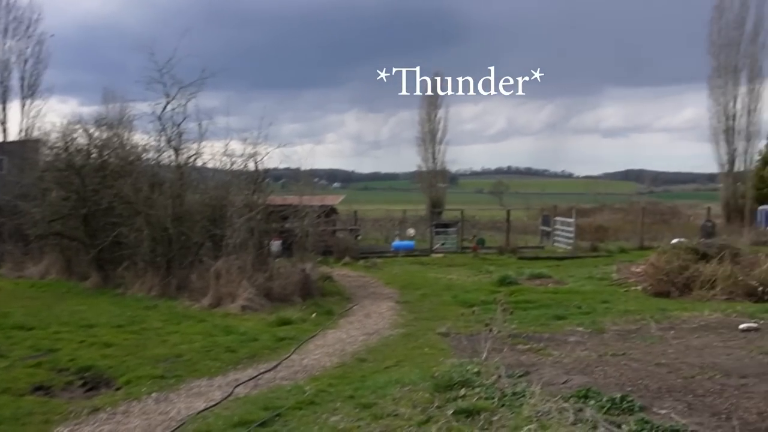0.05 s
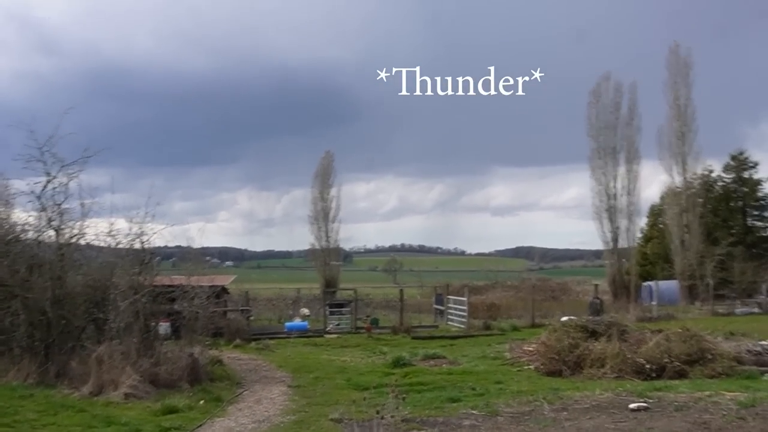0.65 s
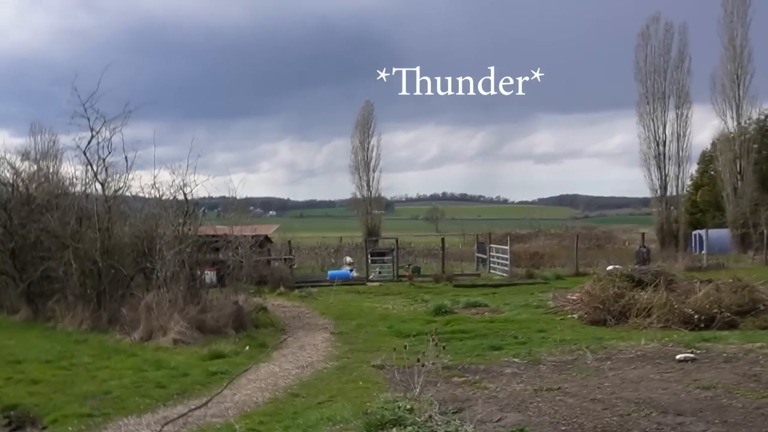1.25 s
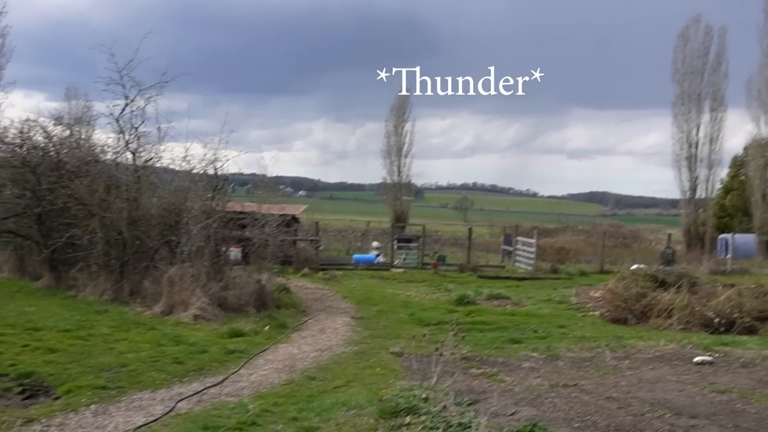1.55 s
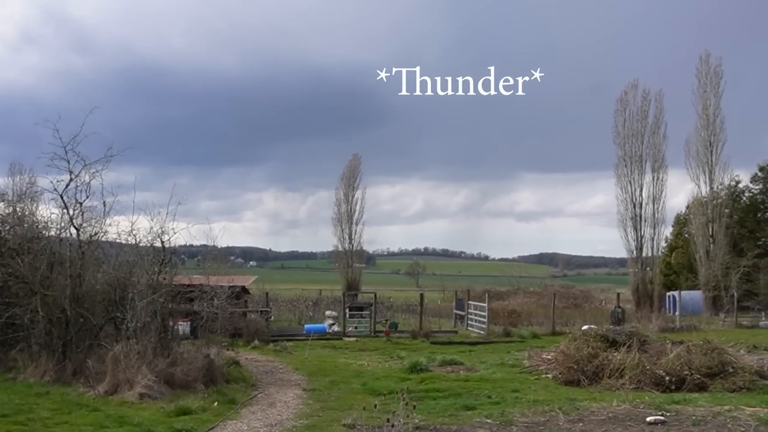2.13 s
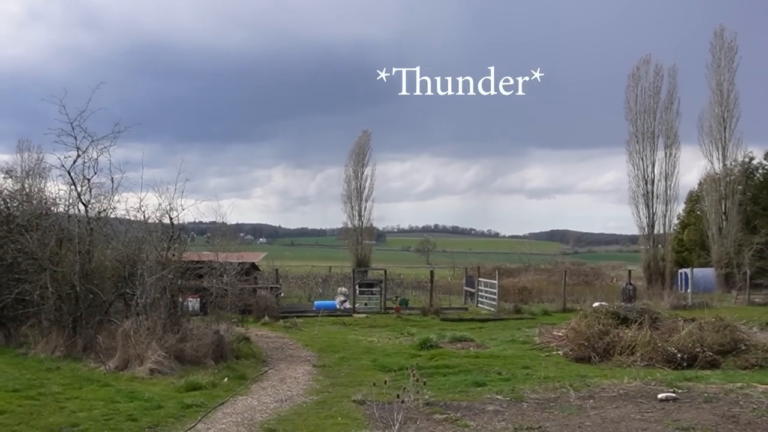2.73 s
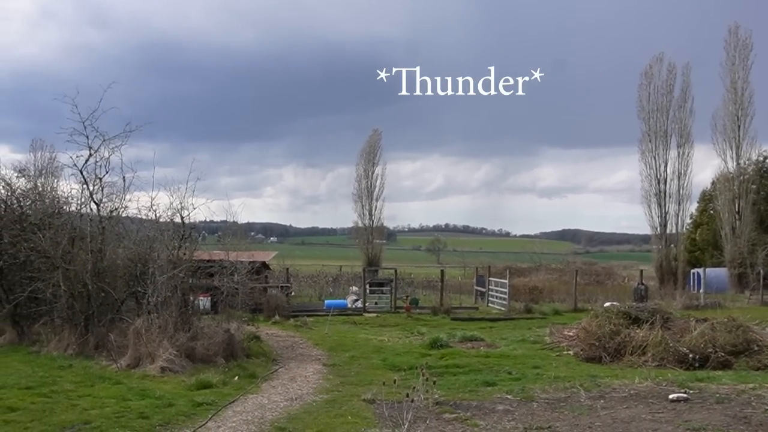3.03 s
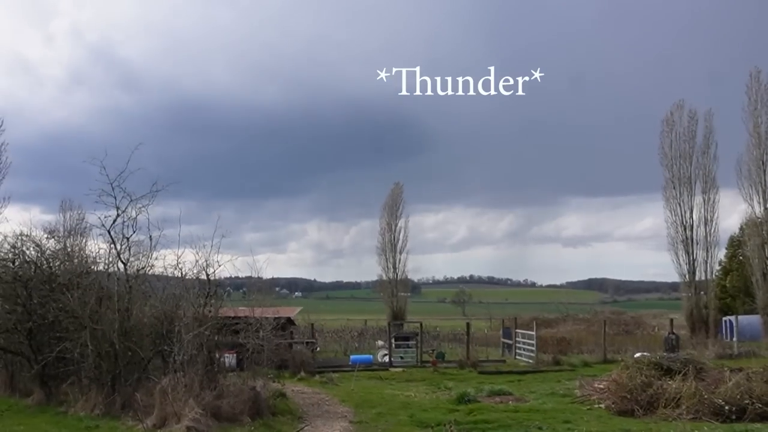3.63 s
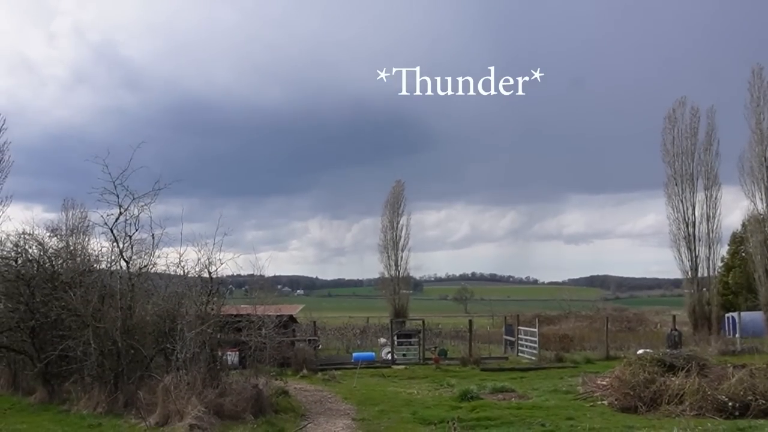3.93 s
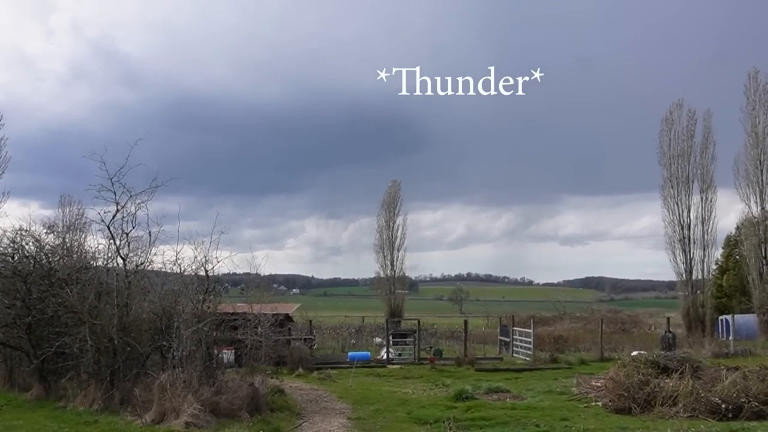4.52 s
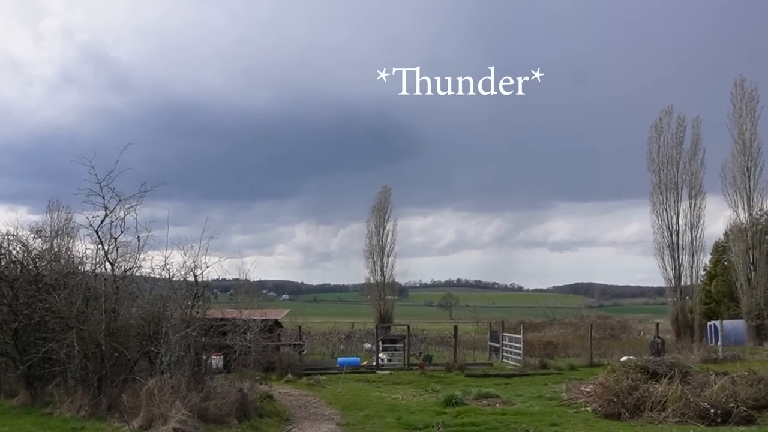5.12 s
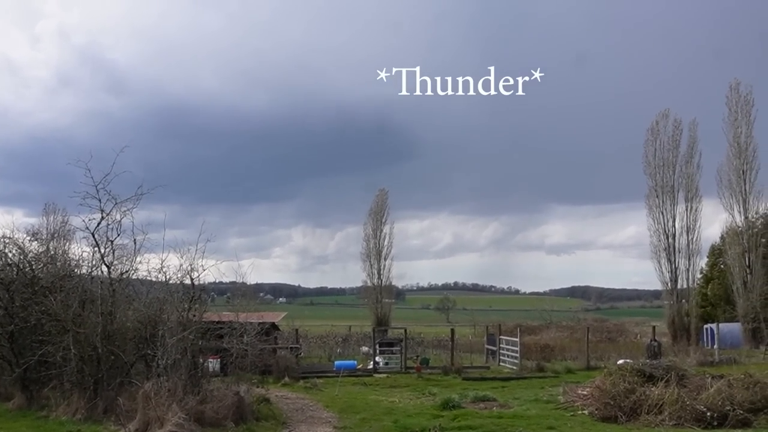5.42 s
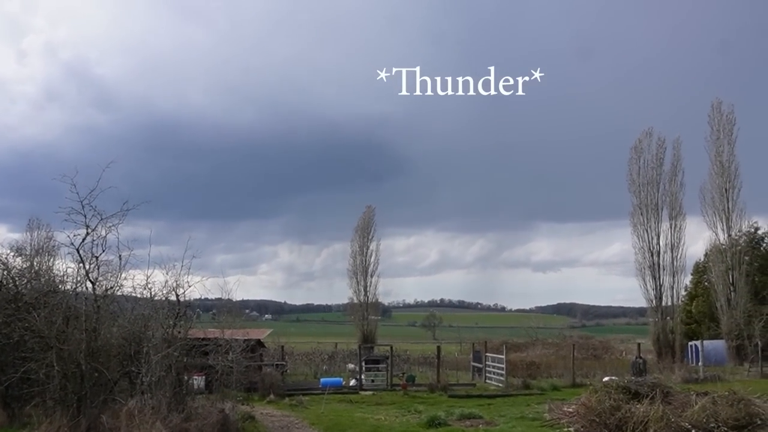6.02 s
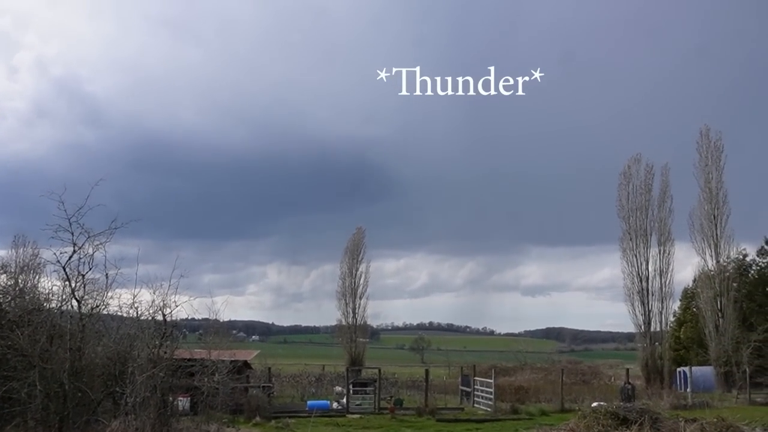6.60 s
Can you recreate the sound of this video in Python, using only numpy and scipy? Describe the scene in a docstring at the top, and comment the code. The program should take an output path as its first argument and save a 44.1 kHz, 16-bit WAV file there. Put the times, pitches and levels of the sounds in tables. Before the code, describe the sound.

Distant thunder rolls in two long, low swells and fades while small birds chirp and whistle over open farmland.

```python
"""Distant thunder rolls over open farmland in two long swells and dies away: shocks from the lightning
channel, dulled by distance and blurred by the hills. Small birds in a hedge whistle, buzz, chirp and
scold throughout, with gliding tones and fast throat pulses that the trees scatter back. Something snaps
once close by. Underneath, the fields hush, a far engine drones and wind nudges the microphone."""
import sys
import numpy as np
from scipy import signal
from scipy.fft import rfft, irfft, next_fast_len
from scipy.io import wavfile
from scipy.ndimage import map_coordinates

SR = 44100
rng = np.random.default_rng(int(sys.argv[2]) if len(sys.argv) > 2 else 0)


def pcm_store(signal):
    """Save signal as 16-bit PCM."""
    levels = np.round(np.clip(np.atleast_2d(signal), -1, 1) * 32767)
    wavfile.write(sys.argv[1], SR, levels.astype(np.int16).T)


N = 302526


def amp(db):
    """Decibels to gain."""
    return 10 ** (np.asarray(db) / 20)


def unit(x):
    """Scale to rms 1."""
    return x / np.sqrt(np.mean(x ** 2) + 1e-20)


def seconds(length):
    """Sample times of a stretch."""
    return np.arange(max(int(length * SR), 8)) / SR


def wobble(rate, size=N):
    """Smooth random modulation, rate knots a second."""
    knots = rng.standard_normal(int(size * rate / SR) + 4)
    return map_coordinates(knots, [np.arange(size) * rate / SR])


def coloured(x, eq):
    """x through an EQ curve of (f/Hz, level/dB) points, at rms 1."""
    m = next_fast_len(len(x) + 8192)
    hz, db = np.transpose(eq)
    gain = amp(np.interp(np.log(np.fft.rfftfreq(m, 1 / SR) + 1), np.log(hz + 1), db))
    return unit(irfft(rfft(x, m) * gain, m)[:len(x)])


def tone(hz):
    """A sine of rms 1 that follows a pitch curve."""
    return np.sqrt(2) * np.sin(2 * np.pi * np.cumsum(hz) / SR)


def gate(t, attack_s, release_s):
    """Soft start and end of a note."""
    return np.sin(np.pi / 2 * np.clip(np.minimum(t / attack_s, (t[-1] - t) / release_s), 0, 1)) ** 2


def add(track, s, x):
    """Mix x into the track at time s."""
    i = max(int(s * SR), 0)
    track[i:i + len(x)] += x[:max(N - i, 0)]


def swells(rows, rest_db):
    """Level in dB of bell-shaped swells that rise out of a steady rest."""
    t = np.arange(N) / SR
    power = sum(amp(db) ** 2 * np.exp(-((t - s) / width) ** 2) for s, db, width in rows)
    return 10 * np.log10(power + amp(rest_db) ** 2)


# Bouts of activity in the hedge: t/s, peak level/dB, half-width/s
BUSTLE_BOUTS = [(.08, 4.5, 0.23), (.88, 1.5, 0.28), (1.7, -1.5, 0.15), (2.3, 1, 0.19), (2.8, 4, 0.27),
                (3.52, -1, 0.074), (3.98, .5, 0.25), (4.76, 7, 0.11), (5.1, 3, 0.15), (5.42, 7, 0.13),
                (6.12, -2, 0.36)]

def bustle_db():
    """A shared fader ride: how busy the hedge is."""
    return swells(BUSTLE_BOUTS, rest_db=-6)


# EQ of the open-air bed: f/Hz, level/dB
AIR_EQ = [(30, -47), (110, -3.5), (200, 5.5), (300, -11.5), (750, -4.5), (1300, -9), (2200, -15.5),
          (4100, -21.5), (5700, -25), (8500, -28), (10300, -36), (15500, -37)]

def air(level_db=-50, stir=0.41):
    """The hush of the open fields, a little fuller when the hedge is busy."""
    hush_db = level_db + stir * bustle_db() + wobble(2.606)
    return amp(hush_db) * coloured(rng.standard_normal(N), AIR_EQ)


# Fader ride of the drone: t/s, level/dB
DRONE_RIDE = [(0, -50), (1.2, -61), (2.2, -41.5), (4.8, -41), (5.6, -44.5), (6.86, -44)]
# Engine orders: multiple of the firing rate, relative level/dB
DRONE_ORDERS = [(1, 0.5), (1.5, -18.5), (2, -10), (3, -26.5)]

def engine(firing_hz=82.6, trim_db=-1, waver_db=2.36):
    """Only the lowest orders of a far engine carry over the fields, wavering on the way."""
    drone_db = np.interp(np.arange(N) / SR, *np.transpose(DRONE_RIDE)) + trim_db
    hz = firing_hz * (1 + 0.0057 * wobble(4.4))
    return sum(amp(drone_db + db + waver_db * wobble(5)) * tone(k * hz) for k, db in DRONE_ORDERS)


# Gusts: t/s, peak level/dB, half-width/s
WIND_GUSTS = [(.32, -34, 0.17), (.73, -37.5, 0.061), (1.13, -35.5, 0.062), (1.66, -32.5, 0.33),
              (2.25, -32, 0.2), (2.68, -32.5, 0.17), (3.13, -36, 0.066), (3.6, -36, 0.38),
              (4.33, -35.5, 0.085), (4.85, -45.5, 0.23), (6.42, -41, 0.12), (6.7, -38, 0.041)]
# EQ of the bassy buffeting: f/Hz, level/dB
BUFFET_EQ = [(8, 7), (25, 13.5), (50, -1), (100, -3.5), (170, -11), (350, -43), (1000, -110)]

def wind(calm_db=-51.5, trim_db=2.5):
    """Light gusts buffet the microphone."""
    buffet_db = swells(WIND_GUSTS, calm_db) + trim_db + 0.36 * wobble(26)
    return amp(buffet_db) * coloured(rng.standard_normal(N), BUFFET_EQ)


# EQ of the fine crackle in the hedge: f/Hz, level/dB
CRACKLE_EQ = [(300, -27), (1200, -8.5), (2500, 0.5), (4500, 8), (6500, -1.5), (8800, -3), (10500, -21),
              (15000, -36)]

def flock(count=340, pip_db=-61, crackle_db=-63, crackles_per_s=280, crackle_t60=0.048):
    """Birds deeper in the hedge give tiny falling pips amid a dry crackle; both follow their bustle."""
    calls = np.zeros(N)
    for when, pitch, slope, size, span in rng.random((count, 5)):
        t = seconds(0.0072 + 0.0094 * span)
        hz = 1300 * 3.3 ** pitch * (1 - slope * 12 * t + 0.09 * wobble(990, len(t)))
        add(calls, when * N / SR, amp(pip_db + 7.2 * size ** 2) * tone(hz) * gate(t, 0.00034, 0.0015))
    touches = (rng.random(N) < crackles_per_s / SR) * rng.exponential(size=N)
    bursts = signal.fftconvolve(touches, amp(-60 * seconds(0.01) / crackle_t60))[:N]
    crackle = coloured(bursts * rng.standard_normal(N), CRACKLE_EQ)
    return amp(bustle_db()) * (calls + amp(crackle_db) * crackle)


def clicks(contacts, eq, t60, trim_db):
    """Each contact is a soft-clipped noise burst that dies within milliseconds."""
    out, t = np.zeros(N), seconds(0.03)
    for s, db in contacts:
        burst = unit(np.tanh(0.5 * coloured(rng.standard_normal(len(t)), eq)))
        add(out, s, amp(db + trim_db - 60 * t / t60) * burst)
    return out


# Tick cues: t/s, level/dB
TICK_CUES = [(.49, -32), (.93, -32), (1.625, -36), (2.317, -32), (3.363, -32.5), (3.448, -33.5),
             (3.793, -32), (4.653, -39), (5.565, -27.5)]
# EQ of a tick: f/Hz, level/dB
TICK_EQ = [(500, -22), (2000, 11), (4500, 0), (8500, -2), (11000, -14.5), (15500, -19)]

def ticks():
    """Sparse, bright, dry ticks."""
    return clicks(TICK_CUES, TICK_EQ, t60=0.0066, trim_db=-7.5)


# Contacts of the snap: t/s, level/dB
SNAP_CONTACTS = [(4.0232, -22.5), (4.0293, -17), (4.0325, -14)]
# EQ of its crack: f/Hz, level/dB
SNAP_EQ = [(150, -26.5), (450, -25), (700, -11), (1120, 2), (1500, -20), (2200, 0), (3600, -10.5),
           (5400, -9.5), (6700, -4.5), (9000, -11.5), (15600, -13)]
# Ringing modes of the snapped thing: f/Hz, relative level/dB, t60/s
SNAP_MODES = [(710, -6.5, 0.033), (1054, -7, 0.018), (1715, -11, 0.023)]

def snap():
    """A sharp crack in quick contacts, each knocking a small hollow body."""
    out = clicks(SNAP_CONTACTS, SNAP_EQ, t60=0.014, trim_db=-3)
    t = seconds(0.04)
    for s, db in SNAP_CONTACTS:
        for hz, mode_db, t60 in SNAP_MODES:
            ring = np.sin(2 * np.pi * (hz * t + rng.random()))
            add(out, s, amp(db + mode_db - 60 * t / t60) * ring)
    return out


# Pip cues: t/s, length/s, centre f/Hz, level/dB
PIP_CUES = [(.755, 0.016, 2390, -50.5), (.858, 0.01, 3170, -45.5), (.872, 0.015, 3160, -55),
            (0.943, .007, 2780, -48), (.983, 0.0064, 3130, -47), (1.258, 0.009, 3270, -54),
            (2.19, .008, 5240, -49.5), (2.206, 0.0086, 3130, -50.5), (2.35, 0.0074, 2950, -48),
            (2.413, 0.01, 2510, -47.5), (2.573, .004, 4650, -41), (2.583, .004, 4820, -38),
            (3.572, 0.0039, 4710, -38), (6.007, 0.0056, 2220, -45), (6.753, 0.0044, 4670, -46),
            (6.7635, 0.0036, 5000, -38.5)]

def pips(fall=0.19, rasp=0.072):
    """Tiny bird notes that slide down within milliseconds."""
    out = np.zeros(N)
    for s, length, centre_hz, db in PIP_CUES:
        t = seconds(length)
        hz = centre_hz * (1 - fall * (t / t[-1] - 0.5) + rasp * wobble(930, len(t)))
        add(out, s, amp(db) * tone(hz) * gate(t, 0.001, 0.0012))
    return out


# Two-note chirps: t/s, top f/Hz, level/dB
CHIRP_CUES = [(0, 4690, -43), (1.693, 4580, -48.5), (2.775, 4600, -44), (3.823, 4600, -47),
              (4.706, 4740, -43.5), (5.848, 4560, -43.5)]

def chirps(octave_db=-28, trim_db=-5, spacing_s=0.069, rasp=0.008):
    """Pairs of short arched notes, the second one lower and flatter."""
    out = np.zeros(N)
    for s, top_hz, db in CHIRP_CUES:
        pair = [(s, 0.033, top_hz, 0.25), (s + spacing_s, 0.0414, top_hz * 0.835, 0.15)]
        for start, length, note_hz, arch in pair:
            t = seconds(length)
            hz = note_hz * (1 - arch * np.linspace(-1, 1, len(t)) ** 2 + rasp * wobble(1070, len(t)))
            voice = tone(hz) + amp(octave_db) * tone(2 * hz)
            level = amp(db + trim_db + 1.4 * wobble(250, len(t)))
            add(out, start, level * voice * gate(t, 0.0032, 0.0039))
    return out


# Resonances of a scolding throat: multiple of the centre frequency, level/dB
THROAT_EQ = [(.3, -24.5), (.45, 0), (.6, -13.5), (.75, -2.5), (.92, -4.5), (1.25, -8), (1.5, -23),
             (1.85, -27), (2.2, -22.5), (2.6, -37), (3.6, -30)]

def chip(length, centre_hz, pulse_ratio=0.305, fall=0.251, breath=0.35, rasp=0.04):
    """A scolding note: fast pulses ring the bird's throat, hold their pitch and drop as the note dies."""
    t = seconds(length + 0.0085)
    hz = centre_hz * pulse_ratio * (1 - fall * (t / t[-1]) ** 4 + rasp * wobble(690, len(t)))
    pulses = unit(sum(tone(k * hz) for k in range(1, 11)))
    throat = [(k * centre_hz, db) for k, db in THROAT_EQ]
    voice = coloured(pulses + breath * rng.standard_normal(len(t)), throat)
    flutter = amp(2 * wobble(330, len(t)))
    return unit(voice * flutter) * gate(t, 0.00095, 0.0045)


# Harsh foreground chips: t/s, length before the tail/s, centre f/Hz, level/dB
CHIP_CUES = [(0.315, 0.0068, 3840, -43), (0.3325, 0.011, 4060, -34.5), (0.567, 0.02, 3890, -48.5),
             (0.786, 0.011, 4450, -49), (0.828, 0.015, 2970, -48), (2.051, 0.0099, 3590, -44.5),
             (2.549, 0.013, 3880, -45.5), (2.892, 0.015, 3640, -45), (3.124, 0.0064, 3160, -44.5),
             (3.53, 0.022, 4090, -48), (3.978, 0.016, 4540, -50), (4.155, 0.013, 4030, -41.5),
             (4.211, 0.0096, 3800, -43.5), (4.585, 0.02, 3820, -44.5), (5.266, 0.011, 4130, -30.5),
             (5.649, 0.0093, 3100, -48), (6.014, 0.011, 4090, -31), (6.087, .022, 3710, -49),
             (6.155, 0.0086, 3010, -45)]

def scolding(soft_count=24, soft_db=-58, soft_hz=3700, soft_s=0.0102):
    """The near birds scold; softer chips come at random, stronger when the hedge is busy."""
    near, soft = np.zeros(N), np.zeros(N)
    for s, length, centre_hz, db in CHIP_CUES:
        add(near, s, amp(db) * chip(length, centre_hz))
    for slot, (when, span, pitch) in enumerate(rng.random((soft_count, 3))):
        s = (slot + when) / soft_count * N / SR
        add(soft, s, chip(soft_s * (0.5 + span), soft_hz * 1.6 ** (pitch - 0.5)))
    return near + amp(soft_db + bustle_db()) * soft


# Buzzy notes: t/s, length/s, first f/Hz, last f/Hz, sweep depth/Hz, sweep rate/Hz, level/dB, octave/dB
BUZZ_CUES = [(1.105, .15, 6050, 5250, 500, 200, -60.5, -28),
             (1.404, 0.065, 5700, 5600, 750, 100, -58.5, -16),
             (1.467, 0.049, 7550, 8160, 735, 330, -52.5, -35),
             (1.9, 0.22, 8500, 7550, 450, 140, -67.5, -35), (2.892, 0.077, 3900, 4080, 1010, 176, -46, -18),
             (2.917, 0.28, 3333, 3260, 40, 77, -56.5, -10), (2.915, 0.25, 4070, 4150, 90, 180, -60, -7),
             (2.905, 0.176, 4920, 5020, 25, 240, -62, -29),
             (2.976, 0.236, 8100, 8220, 520, 290, -54.5, -35),
             (4.039, 0.072, 3345, 3200, 347, 102, -39, -37),
             (4.097, 0.054, 3260, 3192, 110, 123.3, -38.5, -24),
             (4.131, 0.11, 3210, 3270, 50, 100, -51, -5.5), (5.39, 0.22, 7550, 7750, 585, 400, -61, -22),
             (5.898, 0.25, 7340, 7950, 604, 320, -56.5, -44), (6.346, 0.39, 7150, 8070, 573, 290, -63, -37),
             (6.356, 0.44, 4014, 4285, 510, 286, -59.5, -23)]

def buzzes(jitter_hz=9, rough_db=2, pulse_db=3, overtone_step_db=-10.5):
    """A bird's pitch sweeps up and down fast enough to buzz, and each sweep is a pulse."""
    out = np.zeros(N)
    for s, length, first_hz, last_hz, sweep_hz, rate, db, octave_db in BUZZ_CUES:
        t = seconds(length)
        cycle = 2 * np.pi * np.cumsum(rate + jitter_hz * wobble(91.6, len(t))) / SR
        sweep = np.cos(cycle) + 0.17 * wobble(600, len(t))
        hz = np.linspace(first_hz, last_hz, len(t)) + sweep_hz * sweep
        pulses = unit(amp(pulse_db * np.sin(cycle) + rough_db * wobble(222, len(t))))
        overtones = sum(amp(octave_db + overtone_step_db * (k - 2)) * tone(k * hz)
                        for k in (2, 3, 4) if k * hz.max() < SR / 2)
        add(out, s, amp(db) * (tone(hz) + overtones) * pulses * gate(t, 0.067 * length, 0.38 * length))
    return out


# Three whistling birds: t/s, length/s, first f/Hz, last f/Hz, bow/Hz, level/dB, swell/dB, octave/dB
MELLOW_BIRD = [(1.06, 0.26, 2240, 2097, -150, -59.5, -6, -28), (1.645, 0.25, 2414, 2630, 30, -50.5, 1, -20),
               (2.97, .2, 2390, 2500, -230, -48.5, 16, -39), (3.115, .31, 2480, 2700, -10, -49, -5, -42),
               (4.23, 0.27, 1866, 2120, 60, -63.5, -13, -42)]
THIN_BIRD = [(.43, 0.15, 8500, 8060, 399, -58.5, -7, -40), (1.12, 0.18, 8250, 7670, -230, -65, -6, -40),
             (1.402, 0.098, 8600, 7540, -800, -48, 10, -39), (1.655, 0.052, 5180, 5740, 200, -65, -3, -40),
             (2.45, 0.064, 8100, 7850, -44, -61, -2, -40), (2.73, 0.047, 5300, 5730, 100, -58, 3, -40),
             (4.44, .16, 7600, 7760, 97, -67, -5, -44), (5.8, .035, 4950, 5400, 62, -57, 0, -40)]
NEAR_BIRD = [(.16, 0.16, 4480, 4180, -78, -54.5, -7, -37), (1.37, 0.23, 4700, 4250, -190, -52, -13, -37),
             (2.585, 0.22, 4550, 4240, -210, -43.5, -2, -23.5), (3.21, 0.15, 4820, 4300, -45, -67, -7, -29),
             (3.452, .12, 4680, 4260, -23, -46.5, -7, -32), (3.575, 0.083, 4315, 3950, 14, -42, 6, -19.5),
             (3.615, 0.44, 3993, 3566, -9.5, -48.5, 11, -7.5),
             (4.745, 0.14, 4060, 4020, -4, -48, -3, -18.5), (4.908, 0.049, 4270, 4340, 198, -48.5, -4, -13),
             (5.086, 0.023, 4320, 4840, 120, -48, -1, -24), (5.12, 0.088, 4600, 4740, 151, -51, 3.5, -12.5),
             (5.212, 0.073, 4770, 4080, 26, -43.5, -6, -24),
             (5.415, 0.17, 4660, 4110, -59, -49.5, -10.5, -25), (5.55, 0.21, 4230, 4360, -31, -57, -5, -30),
             (6.762, .125, 4420, 4080, -28, -42, 3, -17)]

def whistles(notes, flutter_db, waver, third_db, attack=0.28, release=0.25, full_voice_db=-37):
    """Bowed glides that swell or fade, brighter when louder; reflections make each partial flutter."""
    out = np.zeros(N)
    for s, length, first_hz, last_hz, bow_hz, db, swell_db, octave_db in notes:
        t = seconds(length)
        progress = t / t[-1]
        glide_hz = first_hz + (last_hz - first_hz) * progress + bow_hz * (1 - (2 * progress - 1) ** 2)
        hz = glide_hz * (1 + waver * wobble(164, len(t)))
        effort_db = swell_db * (progress - 0.5)
        note_db = db + effort_db
        partials_db = [0, octave_db + 2.7 * effort_db, third_db + 0.89 * (note_db - full_voice_db)]
        voice = sum(amp(note_db + level + flutter_db * np.sqrt(k) * wobble(45.1, len(t))) * tone(k * hz)
                    for k, level in enumerate(partials_db, 1) if k * hz.max() < SR / 2)
        add(out, s, voice * gate(t, attack * length, release * length))
    return out


def tree_echo(send, t60, build_s, sway_hz=16, count=3):
    """Trees scatter sound back; their twigs sway, so the echo keeps shifting between several tails."""
    t = seconds(0.7)
    tails = rng.standard_normal((count, len(t))) * amp(-60 * t / t60) * (1 - np.exp(-t / build_s))
    tails /= np.linalg.norm(tails, axis=1, keepdims=True)
    shares = np.array([wobble(sway_hz) for _ in tails])
    echoes = signal.fftconvolve(send[None], tails, axes=1)[:, :N]
    return np.sum(echoes * shares, axis=0) / np.linalg.norm(shares, axis=0)


# Peals of thunder: peak t/s, peak level/dB, rise/(dB/s), fade/(dB/s)
THUNDER_PEALS = [(.16, -35.5, 40, 3.5), (1.25, -34, 38, 18), (2.08, -40.5, 160, 1.5), (3.69, -40, 80, 6),
                 (4.58, -37, 31, 17), (5.17, -46, 58, 48)]
# The lull between the two swells: start t/s, end t/s, depth/dB
THUNDER_LULL = (2.54, 3.97, 11.3)

def peals_db(floor_db=-63, duck_s=0.084):
    """Envelope of the roll: peals build and fade over a far rumble, ducking between the two swells."""
    t = np.arange(N) / SR
    power = sum(amp(db - np.maximum(rise * (s - t), fade * (t - s))) ** 2
                for s, db, rise, fade in THUNDER_PEALS)
    start, end, depth_db = THUNDER_LULL
    lull = np.interp(t, [start, start + duck_s, end], [0, 1, 0])
    return 10 * np.log10(power + amp(floor_db) ** 2) - depth_db * lull


# EQ of the distant roll: f/Hz, level/dB
ROLL_EQ = [(30, -30), (60, 7.5), (100, 1), (160, -0.5), (240, -0.5), (350, 0), (500, -4.5), (750, -11.5),
           (1050, -21), (1500, -27), (2300, -56), (4500, -100)]
# Single shocks that stand out of the roll: t/s, peak level/dB, f/Hz
THUNDER_THUMPS = [(0.273, -21.5, 200), (.402, -24, 362), (0.61, -20, 375), (1.195, -19.5, 295),
                  (1.304, -31, 334), (1.423, -14, 202), (1.436, -24, 266), (1.575, -24.5, 220),
                  (1.963, -27.5, 183), (3.665, -27, 175), (3.715, -26, 275), (3.79, -32, 324),
                  (4.033, -19, 230), (4.357, -21, 270), (4.539, -19.5, 266), (4.63, -21.5, 280),
                  (4.835, -25.5, 149)]

def thunder(shocks_per_s=260, waver_db=1.4, echo_db=-12, echo_t60=0.29):
    """Shocks from all along the lightning channel arrive dulled by distance and blurred by the hills."""
    shocks = (rng.random(N) < shocks_per_s / SR) * rng.standard_normal(N)
    blur = rng.standard_normal(N)
    out = coloured(unit(shocks) + blur, ROLL_EQ) * amp(peals_db() + waver_db * wobble(21.784))
    t = seconds(0.12) - 0.02  # zero at the peak of a thump
    for s, db, hz in THUNDER_THUMPS:
        spread = (np.pi * hz * t) ** 2
        swing = (1 - 2 * spread) * np.exp(-spread)  # one rounded pressure swing
        band = [(hz / 4, -30), (hz * 0.8, 0), (hz * 1.3, 0), (hz * 4, -45), (hz * 10, -100)]
        tail = amp(echo_db - 60 * np.abs(t) / echo_t60) * np.clip(t * hz, 0, 1)
        ground_echo = coloured(rng.standard_normal(len(t)), band) * tail
        add(out, s + t[0], amp(db) * (swing + ground_echo))
    return out


def scene():
    """A mono mix on both channels, with sends to the hedge and to the longer echo of the tree line."""
    song = whistles(NEAR_BIRD, flutter_db=2.5, waver=0.0057, third_db=-28, attack=0.14, release=0.14)
    song += whistles(THIN_BIRD, flutter_db=2.8, waver=0.0085, third_db=-40)
    low_song = whistles(MELLOW_BIRD, flutter_db=1.5, waver=0.0064, third_db=-45)
    trills = buzzes()
    chatter = scolding() + pips() + flock()
    pairs, crack, ticking = chirps(), snap(), ticks()
    hedge_send = (amp(-10) * song + amp(-15) * low_song + amp(-0.5) * trills
                  + amp(-5) * chatter + pairs + amp(-23) * crack)
    tree_line_send = song + amp(-6) * low_song + amp(-3) * trills
    echo = tree_echo(hedge_send, t60=0.23, build_s=0.0036)
    echo += amp(-11) * tree_echo(tree_line_send, t60=0.65, build_s=0.02)
    birds = song + low_song + trills + chatter + pairs
    mono = thunder() + wind() + air() + engine() + birds + ticking + crack + echo
    return np.array([mono, mono])


def record(dry, top_hz=15750, edge_hz=250):
    """A steep high cut on the whole mix."""
    m = next_fast_len(N + 8192)
    passband = np.clip((top_hz - np.fft.rfftfreq(m, 1 / SR)) / edge_hz + 0.5, 0, 1)
    return irfft(rfft(dry, m) * passband, m)[:, :N]


dry = scene()
out = record(dry)
pcm_store(out)
```